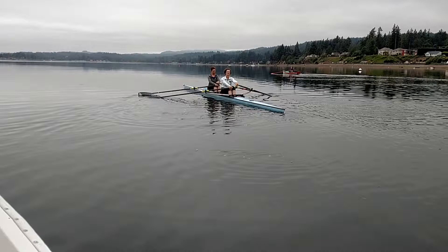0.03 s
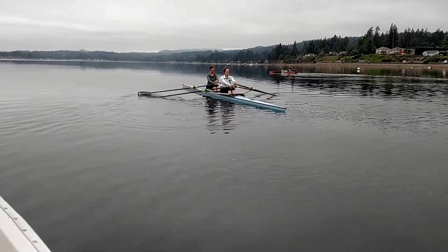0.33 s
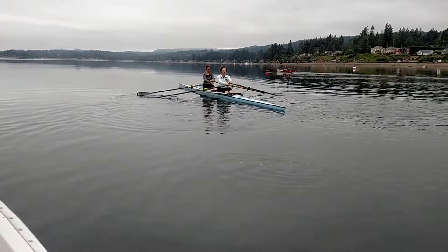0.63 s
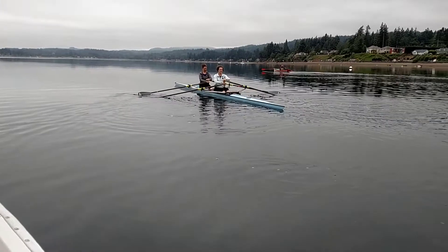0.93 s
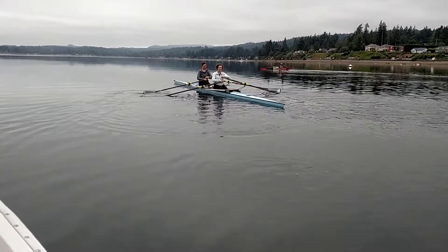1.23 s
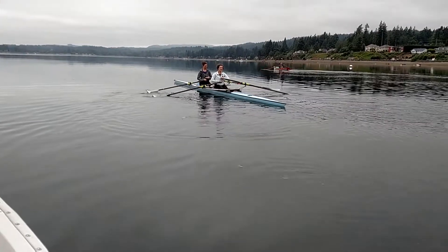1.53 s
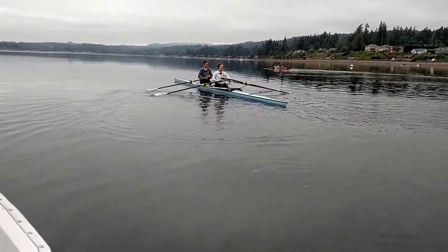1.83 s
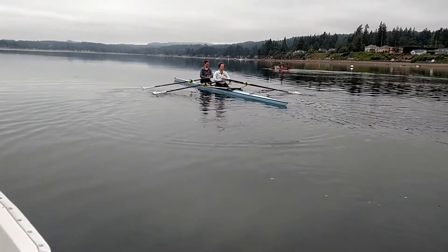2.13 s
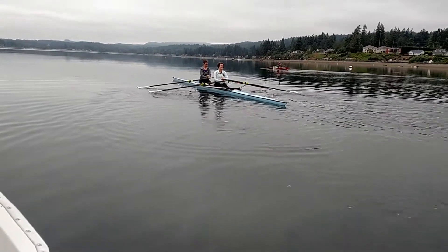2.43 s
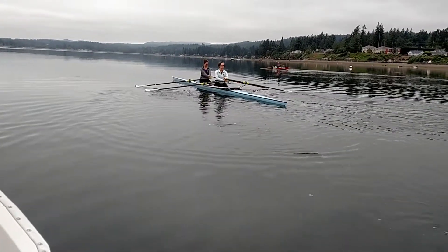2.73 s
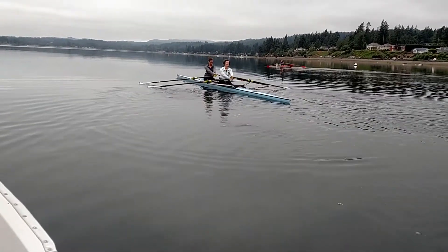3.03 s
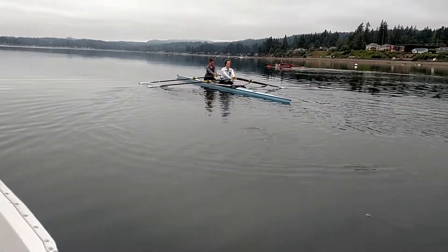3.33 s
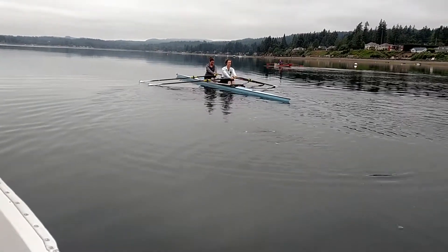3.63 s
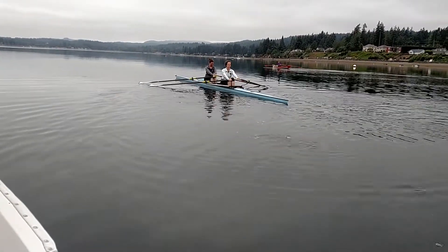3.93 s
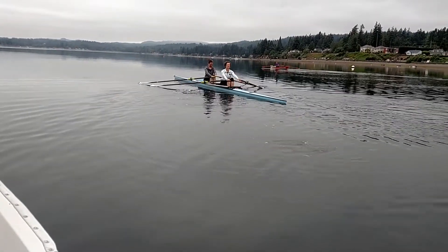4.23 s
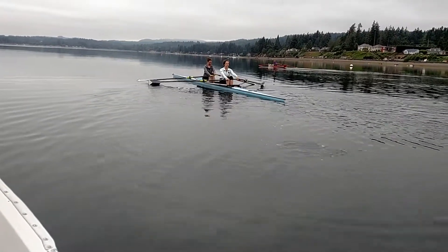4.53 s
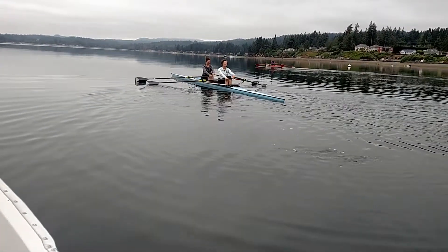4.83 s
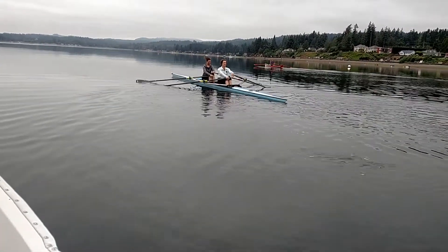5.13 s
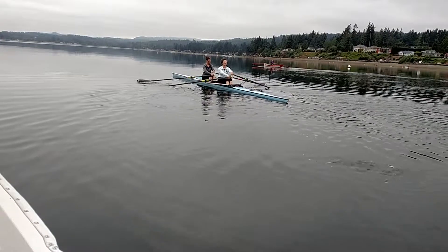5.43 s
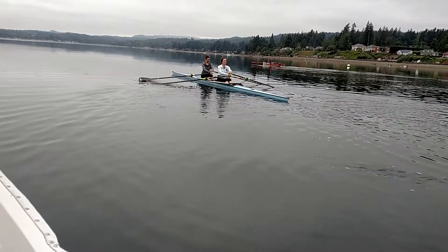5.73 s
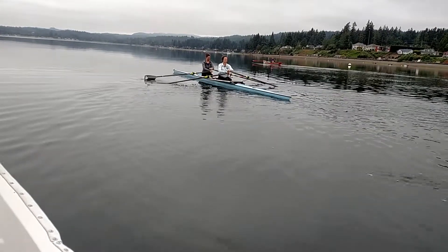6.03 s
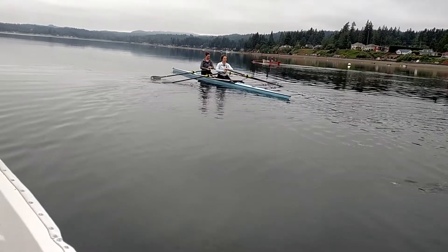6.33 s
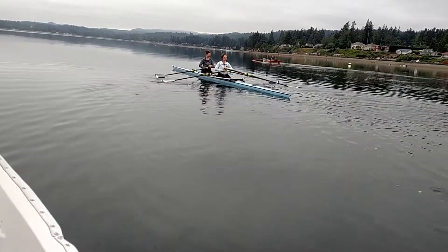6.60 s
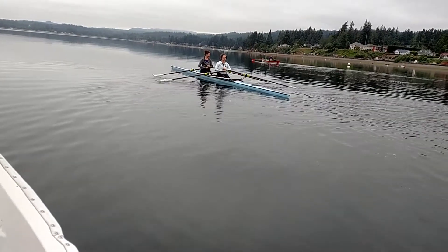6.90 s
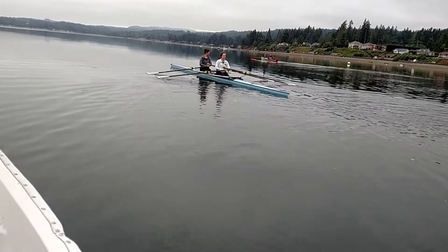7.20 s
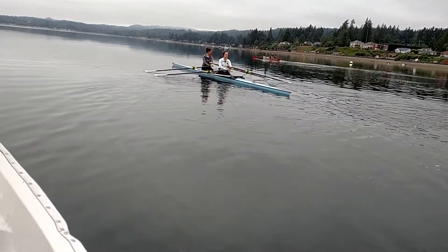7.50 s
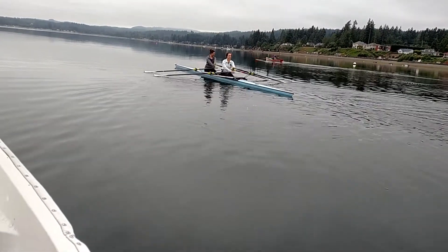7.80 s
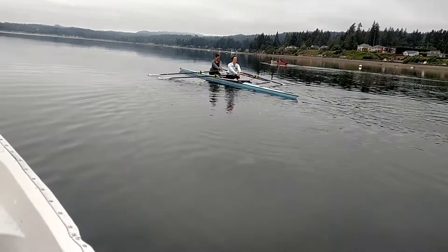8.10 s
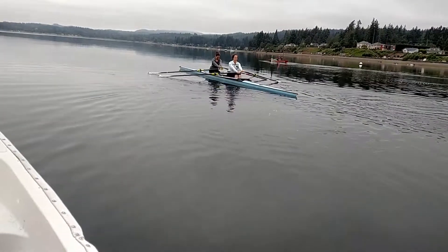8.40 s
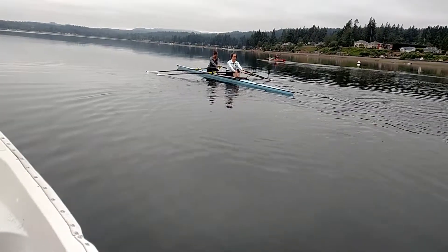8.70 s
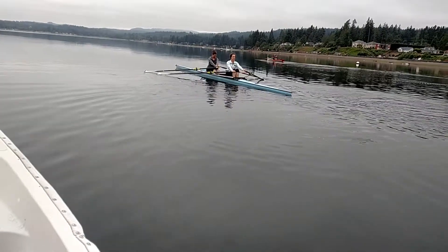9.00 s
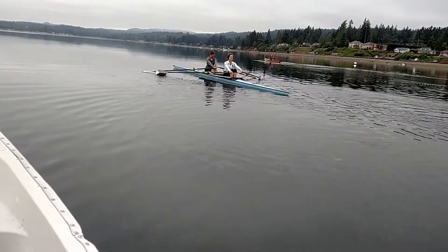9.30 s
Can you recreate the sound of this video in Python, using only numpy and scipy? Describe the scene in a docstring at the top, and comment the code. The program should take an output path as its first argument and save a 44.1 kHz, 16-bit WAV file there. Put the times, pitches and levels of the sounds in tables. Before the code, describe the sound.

On a calm open lake, a small motorboat idles with a muffled hum and a soft wash of water, following a two-person rowing boat. Oar blades splash, gurgle and drip in three main bursts, each with a hollow knock from the oarlocks. A loose fitting on the motorboat rattles now and then. Wind bumps the microphone lightly at first, then grows into strong low buffeting near the end.

```python
"""An outboard idles and water washes along a small launch, which follows a double scull on a calm lake.
The hum is multiples of the firing rate over exhaust burbling under water. The scull's blades slap,
splash and drip, trapping air that rings as bubbles; the oars knock in their locks at the finishes
and once just after a catch. A loose fitting on the launch rattles now and then, and a rising breeze
buffets the microphone."""
import sys
import numpy as np
from scipy import signal
from scipy.io import wavfile
from scipy.ndimage import uniform_filter1d

SR = 44100
rng = np.random.default_rng(int(sys.argv[2]) if len(sys.argv) > 2 else 0)


def output_pcm(signal):
    """Save a mono or channel-first signal as 16-bit PCM at the path in sys.argv[1].

    Samples are clipped to [-1, 1] before scaling.
    """
    pcm = np.clip(np.atleast_2d(signal).T, -1, 1) * 32767
    wavfile.write(sys.argv[1], SR, np.round(pcm).astype(np.int16))


N = 421155
TIME = np.arange(N) / SR
RIPPLE_DB = -67  # floor of the water's stirring

# Outboard loudness. Each row: time in seconds, relative level in dB.
MOTOR_CURVE = [(0.3, -50), (0.8, -55.5), (1.15, -51.5), (1.7, -45.5), (2.05, -56), (2.55, -51), (2.95, -53),
               (3.7, -48), (4.45, -51.5), (5.0, -47), (5.95, -50.5), (6.4, -57), (6.8, -49), (7.2, -58),
               (7.7, -48.5), (8.3, -53.5), (9.55, -49.5)]


def from_db(db):
    """Decibels to gain."""
    return 10 ** (np.asarray(db) / 20)


def unit_rms(x):
    """Scale to rms 1."""
    return x / np.sqrt(np.mean(x ** 2) + 1e-20)


def gain_curve(rows):
    """Rows of (s, dB) to a gain per sample, corners rounded."""
    return uniform_filter1d(from_db(np.interp(TIME, *np.transpose(rows))), size=256)


def db_at(spectrum, hz):
    """Read rows of (Hz, dB) on a log-frequency axis."""
    points_hz, points_db = np.transpose(spectrum)
    return np.interp(np.log(hz), np.log(points_hz), points_db)


def bandpass(x, edges_hz, order):
    """Butterworth band-pass."""
    return signal.sosfilt(signal.butter(order, edges_hz, "band", fs=SR, output="sos"), x)


def drift(rate_hz):
    """Slow random wander, rms about 1."""
    step, run_in = 40, 2000
    pole = np.exp(-2 * np.pi * rate_hz * step / SR)
    white = rng.standard_normal(N // step + run_in + 2)
    slow = signal.lfilter([1], [1, -2 * pole, pole * pole], white)[run_in:]
    return np.interp(np.arange(N) / step, np.arange(len(slow)), unit_rms(slow))


def add(track, start_s, sound):
    """Mix a sound into a track."""
    start = max(round(start_s * SR), 0)
    track[start:start + len(sound)] += sound[:max(N - start, 0)]


def noise(spectrum, flicker_db, flicker_hz):
    """Half-octave noise bands, each flickering on its own; rms 1."""
    out, white = 0, rng.standard_normal((2, N))
    edges_hz = np.geomspace(17, 17400, 21)
    for k, (low, high) in enumerate(zip(edges_hz, edges_hz[1:])):
        hz = np.sqrt(low * high)
        if spectrum[0][0] / 2 < hz < spectrum[-1][0] * 2:
            band = bandpass(white[k % 2], [low, high], order=2)
            out = out + band * from_db(db_at(spectrum, hz) + flicker_db * drift(flicker_hz))
    return unit_rms(out)


def swells(rows, attack_s, release_s, sag_db_per_s=0.0):
    """Gain of events that rise, hold or sag, and die away; their powers add."""
    power = 0
    for start_s, length_s, db in rows:
        age_s = np.maximum(TIME - start_s, 0)
        gain = from_db(db - sag_db_per_s * age_s) * np.minimum(age_s / attack_s, 1)
        power = power + gain ** 2 * np.exp(-np.clip(2 * (age_s - length_s) / release_s, 0, 60))
    return np.sqrt(power)


def outboard(firing_hz=23.155, wander=0.00596, rough_db=1.5, hum_db=4.5, exhaust_db=1.0):
    """Muffled idle: multiples of an unsteady firing rate, over exhaust burbling under water."""
    # Each row: multiple of the firing rate, relative level in dB.
    orders = [(5, -4), (5.5, -3.5), (6, -9.5), (7, -4.5), (9, -4.5), (10, -1), (11, -9), (11.5, -5),
              (12.5, -5.5), (13, -1.5), (14, -4), (15, -11.5), (17, -21.5), (23, -14)]
    # Each row: frequency in Hz, relative density in dB.
    exhaust_spectrum = [(90, -12.5), (125, -0.5), (175, -3.5), (230, -0.5), (315, 0), (400, -17)]
    firings = np.cumsum(firing_hz * (1 + wander * drift(1.995))) / SR
    hum = 0
    for order, db in orders:
        gain = from_db(db + rough_db * drift(6.8))
        hum = hum + gain * np.sin(2 * np.pi * (order * firings + rng.random()))
    burble = noise(exhaust_spectrum, flicker_db=1.5, flicker_hz=13)
    exhaust = signal.sosfilt(signal.butter(6, 360, fs=SR, output="sos"), burble)
    return gain_curve(MOTOR_CURVE) * (from_db(hum_db) * unit_rms(hum) + from_db(exhaust_db) * exhaust)


def wash(level_db=-47.5, motor_share=0.26):
    """The launch pushes through smooth water, a little louder when the motor is."""
    # Each row: frequency in Hz, relative density in dB.
    spectrum = [(25, -6), (70, -13.5), (130, 3), (200, 2), (310, 0.5), (400, 1.5), (560, -4), (750, -7),
                (1100, -7), (1300, -13.5), (1800, -21), (3000, -27), (5000, -33), (9000, -42.5)]
    surge = unit_rms(gain_curve(MOTOR_CURVE) ** motor_share)
    return from_db(level_db) * surge * noise(spectrum, flicker_db=1.85, flicker_hz=10.1)


def wind(breeze_db=-58, rise_db_per_s=1.5, rumble_db=3.5, lumpy_db=4.0,
         flutter_db=-7, flutter_ref_db=-36, flutter_exponent=1.15):
    """Turbulence at the microphone: large eddies rumble; harder gusts carry more small, fast ones."""
    # Each row: frequency in Hz, relative density in dB.
    rumble_spectrum = [(20, -2), (45, 1.5), (75, 2), (120, 0), (165, -8), (230, -16.5), (330, -48),
                       (600, -50.5)]
    # Each row: start in seconds, length in seconds, strength in dB.
    gusts = [(.62, 0.22, -46), (1.24, 0.16, -50), (1.97, 0.14, -48), (2.26, 0.51, -43.5),
             (2.85, 0.5, -50.5), (3.97, 0.41, -44.5), (4.74, 0.29, -45.5), (5.19, 0.21, -40),
             (5.49, 0.23, -39), (5.97, 0.17, -39.5), (6.25, 0.35, -52.5), (6.6, 1.05, -39),
             (7.8, 0.098, -44), (8.24, 0.22, -43.5), (8.54, .07, -32), (8.62, 0.071, -38.5),
             (8.73, 0.16, -34.5), (8.96, 0.17, -36), (9.17, 0.088, -33.5), (9.28, 0.13, -30.5),
             (9.47, .1, -30)]
    rumble = from_db(rumble_db) * noise(rumble_spectrum, flicker_db=2.0, flicker_hz=5.4)
    flutter = unit_rms(bandpass(rng.standard_normal(N), edges_hz=(145, 245), order=4))
    breeze = from_db(breeze_db + rise_db_per_s * TIME)
    strength = np.hypot(breeze, swells(gusts, attack_s=0.0083, release_s=0.052))
    flutter_gain = from_db(flutter_db) * (strength / from_db(flutter_ref_db)) ** flutter_exponent
    lumps = unit_rms(from_db(lumpy_db * drift(22.4)))
    return strength * lumps * (rumble + flutter_gain * flutter)


def stirring(attack_s=0.017, release_s=0.035, drying_db_per_s=3):
    """How hard the water is stirred, as a gain: hull ripples, blade splashes and trickles, run-off."""
    # Each row: start in seconds, length in seconds, strength in dB.
    splashes_and_trickles = [(1.57, 0.032, -59), (1.89, 0.12, -53.5), (2.11, 0.11, -56), (2.33, 0.074, -58),
                             (3.8, 0.14, -62.5), (4.96, 0.057, -60), (6.815, 0.03, -54), (6.96, 0.043, -54),
                             (7.97, .1, -60), (9.45, 0.068, -53.5)]
    # Lifted blades shed water. Each row: start in seconds, length in seconds, initial strength in dB.
    recoveries = [(1.9, 2.07, -59.5), (6.75, 2.9, -59)]
    spray = swells(splashes_and_trickles, attack_s, release_s)
    run_off = swells(recoveries, attack_s, release_s, drying_db_per_s)
    return np.sqrt(from_db(RIPPLE_DB) ** 2 + spray ** 2 + run_off ** 2)


def bubble(hz, t60_cycles, chirp_per_s=1.6, attack_cycles=0.24):
    """Trapped air swells within a cycle, rings down and rises in pitch as it surfaces."""
    t = TIME[:SR // 16]
    tone = np.sin(2 * np.pi * hz * t * (1 + chirp_per_s * t))
    attack = 1 - np.exp(-hz * t / attack_cycles)
    return tone * attack * from_db(-60 * t * hz / t60_cycles)


def splashes(stirred, bubble_db=-1.5, spray_db=-3.0, per_s=450, size_db=2.5, clump_db=2.5):
    """Stirred water: clumps of small bubbles of many pitches over a soft spray."""
    # Each row: frequency in Hz, relative density in dB.
    spectrum = [(400, -6.5), (700, -3.5), (950, 0.5), (1300, -3.5), (1650, -1), (2100, -5), (3200, -10.5),
                (5000, -21), (7500, -26), (12000, -49)]
    clumps = from_db(clump_db * drift(18))
    births_s = TIME[rng.random(N) < per_s * clumps / SR]
    spray = noise(spectrum, flicker_db=-1.5, flicker_hz=22) * clumps
    bubbles = np.zeros(N)
    for start_s, (pitch, size, life) in zip(births_s, rng.random((len(births_s), 3))):
        hz = 600 * 13 ** pitch
        db = db_at(spectrum, hz) - size_db * np.log(size + 0.03)
        height = hz * from_db(db)  # small bubbles die sooner and need more height
        add(bubbles, start_s, height * bubble(hz, t60_cycles=35 * (.5 + life)))
    return stirred * (from_db(bubble_db) * unit_rms(bubbles) + from_db(spray_db) * unit_rms(spray))


def drips(stirred, t60_cycles=52, wobble=0.24, plash_db=-12.0, plash_decay_s=0.0034):
    """Single drops land with a plash and a knot of unsteady bubbles; faint random ones ring just one."""
    # Single drops, and three faint high squeaks at the start.
    # Each row: start in seconds, main tone level in dB, pitch in Hz.
    drops_and_squeaks = [(.352, -57, 3330), (0.386, -52, 3330), (.427, -58.5, 3200), (.778, -47, 2350),
                         (0.835, -44, 1440), (0.977, -44, 1330), (1.342, -54, 2400), (1.715, -50, 1900),
                         (1.825, -50, 3270), (1.849, -38.5, 1900), (1.858, -40, 1080), (1.886, -44, 2000),
                         (1.964, -46, 3220), (2.001, -47, 2400), (2.023, -39, 1210), (2.116, -46, 2030),
                         (2.198, -35.5, 1130), (2.215, -47, 2120), (2.232, -45, 740), (2.402, -48, 3080),
                         (2.41, -46, 2050), (2.545, -50, 3000), (3.108, -52, 4500), (3.911, -41, 1280),
                         (4.226, -46, 2050), (4.798, -40, 1170), (4.875, -40.5, 1760), (4.954, -48, 2140),
                         (4.996, -44.5, 2750), (6.024, -38, 1224), (6.845, -35, 1310), (7.046, -48, 2460),
                         (7.19, -41, 1170), (7.805, -43, 1610)]
    knot_s, knot_db, knot_octaves = .016, -8, 0.21
    faint_per_s, faint_db, tilt_db_per_octave, low_hz, high_hz = 5.7, -54, -4, 1500, 4820
    bubbles, plashes, t = np.zeros(N), np.zeros(N), TIME[:SR // 20]
    for start_s, db, hz in drops_and_squeaks:
        add(bubbles, start_s, from_db(db) * bubble(hz, t60_cycles))
        for lag, detune in rng.random((3, 2)):
            lesser = bubble(hz * 2 ** (knot_octaves * (2 * detune - 1)), t60_cycles)
            add(bubbles, start_s + knot_s * lag, from_db(db + knot_db) * lesser)
        plash = unit_rms(bandpass(rng.standard_normal(len(t)), [hz * 2 / 3, hz * 3 / 2], order=2))
        add(plashes, start_s, from_db(db + plash_db) * plash * np.exp(-t / plash_decay_s))
    unsteady = 1 + wobble * drift(150)
    excess_stir = stirred / from_db(RIPPLE_DB) - 1
    falls_s = TIME[rng.random(N) < faint_per_s * excess_stir / SR]
    for start_s, octaves in zip(falls_s, rng.random(len(falls_s)) * np.log2(high_hz / low_hz)):
        gain = from_db(faint_db + tilt_db_per_octave * octaves)
        add(bubbles, start_s, gain * bubble(low_hz * 2 ** octaves, t60_cycles))
    return bubbles * unsteady + plashes


def slaps(gulp_db=2.0, spray_db=-5.5, spray_t60_s=0.1, attack_s=0.00082):
    """Blade or hull slaps the water, throwing a dull burst and trapping one large bubble."""
    # Each row: start in seconds, relative level in dB, bubble pitch in Hz.
    hits = [(.461, -50, 790), (1.342, -45, 738), (1.666, -39.5, 586), (1.744, -41.5, 590),
            (1.838, -41, 900), (1.849, -38, 716), (1.92, -37, 696), (2.001, -41, 1220),
            (3.892, -40.5, 1300), (4.018, -46, 764), (4.315, -50, 760), (4.936, -39.5, 1260),
            (5.024, -40.5, 1100), (5.053, -42, 1200), (6.016, -39.5, 1430), (6.838, -34.5, 1350),
            (6.869, -38.5, 850), (6.9, -38, 1200), (6.973, -36, 745), (7.015, -40, 1230), (7.044, -42, 920),
            (8.59, -40.5, 1050), (9.475, -46, 3240)]
    # Each row: frequency in Hz, relative density in dB.
    spray_spectrum = [(450, 2.5), (700, 6.5), (950, 0), (1300, 2.5), (1700, -3), (2200, -12), (3200, -16),
                      (5000, -29), (8000, -43)]
    gulps, bursts, t = np.zeros(N), np.zeros(N), TIME[:SR // 4]
    envelope = (1 - np.exp(-t / attack_s)) * from_db(-60 * t / spray_t60_s)
    for start_s, db, hz in hits:
        add(gulps, start_s, from_db(db) * bubble(hz, t60_cycles=36))
        add(bursts, start_s, from_db(db) * envelope)
    spray = bursts * noise(spray_spectrum, flicker_db=1.0, flicker_hz=25)
    return from_db(gulp_db) * gulps + from_db(spray_db) * spray


def buffets(gain_db=1.5, width_cycles=0.79, slowing=0.22):
    """A strong eddy swings the pressure at the microphone a few times, slowing as it passes."""
    # Each row: time of the peak in seconds, relative level in dB, pitch in Hz.
    eddies = [(0.642, -24.5, 67), (1.275, -41, 80), (2.625, -29, 85), (2.775, -30, 68), (3.325, -35, 76),
              (4.279, -25, 99), (4.299, -21, 79), (5.233, -26, 114), (5.375, -26.5, 98), (5.525, -27, 95),
              (5.671, -23.5, 112), (6.628, -22, 105), (6.901, -25.5, 82), (6.96, -16, 81), (7.154, -25, 78),
              (7.209, -23.5, 110), (7.372, -25.5, 103), (7.52, -24.5, 102), (7.652, -27, 80),
              (7.73, -25.5, 84.5), (7.993, -31.5, 105), (8.112, -25, 125), (8.294, -26.5, 104),
              (8.325, -27, 85), (8.404, -25, 84), (8.571, -21, 168), (8.602, -20, 95), (8.675, -22.5, 119),
              (8.768, -15.5, 145), (8.812, -14.5, 128), (8.843, -21, 96), (8.968, -24.5, 110),
              (9.031, -15.5, 118), (9.065, -20, 101), (9.126, -22.5, 117), (9.186, -17, 146),
              (9.208, -20, 96), (9.248, -24, 86), (9.317, -18.5, 87), (9.347, -22, 147), (9.397, -11, 115),
              (9.482, -21.5, 110), (9.509, -16, 165), (9.532, -12, 151)]
    out, t = np.zeros(N), TIME[:SR // 5] - .1
    for (peak_s, db, hz), phase in zip(eddies, rng.random(len(eddies))):
        cycles = hz * t
        swing = np.sin(2 * np.pi * (cycles - slowing * cycles * np.tanh(cycles) + phase))
        add(out, peak_s + t[0], from_db(db + gain_db) * swing / np.cosh(2 * cycles / width_cycles))
    return out


def sloshes(churn_db=-8.0, bubbles_per_s=330, size_range_db=4.0):
    """A hollow left by blade or hull closes with a soft swell and a dense gurgle of large bubbles."""
    # Each row: time of the peak in seconds, gurgle level in dB, half width in seconds.
    hollows = [(1.59, -52, 0.028), (1.686, -52, 0.038), (1.876, -53.5, 0.1), (2.01, -52, 0.048),
               (2.202, -51.5, 0.073), (4.81, -52.5, 0.12), (4.941, -52.5, 0.022), (5.023, -52, 0.1),
               (6.032, -53, 0.033), (6.77, -52, 0.052), (6.877, -51, 0.073), (6.996, -50, 0.061),
               (8.505, -59, 0.11)]
    # Each row: frequency in Hz, relative density in dB.
    spectrum = [(380, 8.5), (550, 7.5), (750, 7.5), (950, 3), (1280, 3.5), (1600, -1.5), (2400, -7)]
    swell = sum(from_db(db) * np.exp(-((TIME - peak_s) / half_s) ** 2) for peak_s, db, half_s in hollows)
    churn = noise(spectrum, flicker_db=4.5, flicker_hz=35)
    gurgle, low_hz, high_hz = np.zeros(N), spectrum[0][0], spectrum[-1][0]
    births_s = TIME[rng.random(N) < bubbles_per_s / SR]
    for start_s, (pitch, size) in zip(births_s, rng.random((len(births_s), 2))):
        hz = low_hz * (high_hz / low_hz) ** pitch
        height = hz * from_db(db_at(spectrum, hz) + size_range_db * size)
        add(gurgle, start_s, height * bubble(hz, t60_cycles=24))
    return swell * (from_db(churn_db) * churn + unit_rms(gurgle))


def spatters(gain_db=-6.5, decay_s=0.0029, width_octaves=0.95):
    """Flung water lands in a crisp crackle a few milliseconds long."""
    # Each row: start in seconds, relative level in dB, band centre in Hz.
    landings = [(1.572, -52, 4200), (1.607, -47, 3300), (1.669, -57, 3700), (1.918, -48, 4300),
                (1.943, -48, 4300), (2.13, -54, 4800), (2.361, -34, 2270), (3.893, -41, 1700),
                (4.314, -47, 3400), (4.715, -46, 2900), (4.935, -46, 3300), (4.994, -40, 3680),
                (6.84, -38, 2900), (6.968, -47, 4000), (7.298, -47.5, 3150), (8.582, -38.5, 2240)]
    out, t = np.zeros(N), TIME[:SR // 20]
    for start_s, db, hz in landings:
        edges_hz = hz * 2 ** (width_octaves * np.array([-.5, .5]))
        crackle = unit_rms(bandpass(rng.standard_normal(len(t)), edges_hz, order=3))
        add(out, start_s, from_db(db + gain_db) * crackle * np.exp(-t / decay_s))
    return out


def ring(force, hz, t60_s):
    """One mode: a unit click starts a decaying sine of height 1."""
    radius, angle = from_db(-60 / (t60_s * SR)), 2 * np.pi * hz / SR
    return signal.lfilter([0, np.sin(angle)], [1, -2 * radius * np.cos(angle), radius ** 2], force + 1e-18)


def loose_fitting(gain_db=4.0, contacts_per_s=2000, contact_db=-6.0, detune=.02,
                  clack_s=0.005, settle_db=-11.0, settle_s=.016):
    """Each shake is a clack and a fainter chatter; the part reseats and rings at slightly new pitches."""
    # Each row: start in seconds, relative peak in dB.
    shakes = [(1.5828, -44), (2.393, -41.5), (2.4854, -39), (2.5786, -42), (2.6725, -42), (2.765, -55),
              (2.856, -49), (2.9468, -46), (3.2038, -46), (3.374, -43), (5.8481, -42), (5.941, -43.5),
              (6.127, -48), (6.755, -43), (7.2272, -44), (7.301, -49), (7.412, -46.5), (7.5526, -40.5),
              (7.643, -41), (7.806, -45.5), (7.912, -46), (8.039, -45), (8.0954, -47), (8.170, -43.5),
              (8.2675, -42.5), (8.4444, -41), (8.468, -44.5), (8.543, -46), (8.7154, -43), (8.8503, -46.5),
              (8.911, -54), (9.243, -47.5)]
    # Each row: frequency in Hz, relative energy in dB, t60 in seconds.
    modes = [(910, -2.5, 0.018), (1233, 1.5, 0.027), (1330, -1, 0.034), (1740, -3.5, 0.014),
             (2290, -10, 0.007), (3250, -12.5, 0.005), (4780, -15, .026), (5250, -22, 0.0078),
             (6930, -23, 0.0089)]
    out, t = np.zeros(N), TIME[:SR // 10]
    force = np.exp(-t / clack_s) + from_db(settle_db) * np.exp(-t / settle_s)
    for start_s, db in shakes:
        contacts = rng.standard_normal(len(t)) * (rng.random(len(t)) < contacts_per_s / SR) * force
        ringing = 0
        for hz, mode_db, t60_s in modes:
            seated_hz = hz * (1 + detune * rng.uniform(-1.1, 1))
            ringing = ringing + from_db(mode_db) * unit_rms(ring(contacts, seated_hz, t60_s))
        clack = bandpass(ringing + from_db(contact_db) * unit_rms(contacts), [700, 7500], order=2)
        add(out, start_s, from_db(db + gain_db) * clack / np.abs(clack).max())
    return out


def oarlocks(gain_db=1.7, low_hz=1050, thud_db=-10.0):
    """Sleeve hits lock: a hollow plastic knock, each with its own brightness and ring, over a shaft thud."""
    # Each row: start in seconds, relative level in dB, t60 multiplier, top of the contact band in Hz.
    knocks = [(2.178, -27.5, .55, 2900), (5.1542, -32, .8, 2590), (5.1620, -27.5, 2, 2150),
              (5.167, -33, 2.7, 1950), (7.1293, -36, 1.5, 2600), (7.1336, -24.5, 1.1, 2980)]
    # Each row: frequency in Hz, relative level in dB, base t60 in seconds.
    modes = [(1340, -16, 0.011), (1560, -5, 0.0074), (2120, -3, 0.0061), (2800, -9, 0.0038)]
    out, click = np.zeros(N), signal.unit_impulse(SR // 10)
    thud = from_db(thud_db) * ring(click, hz=700, t60_s=.012)
    for start_s, db, stretch, top_hz in knocks:
        contact = bandpass(click, [low_hz, top_hz], order=6)
        knock = sum(from_db(mode_db) * ring(contact, hz, t60_s * stretch) for hz, mode_db, t60_s in modes)
        add(out, start_s, from_db(db) * (knock + thud))
    return from_db(gain_db) * out


def scene():
    """Open water, mono: everything arrives directly, without echo."""
    launch = outboard() + wash() + loose_fitting()
    stirred = stirring()
    scull = oarlocks() + slaps() + spatters() + sloshes() + drips(stirred) + splashes(stirred)
    return (launch + scull + wind() + buffets())[None]


def record(dry, hiss_db=-73.5, fade_out_s=.004, cutoff_hz=15600):
    """Steady microphone hiss, short fades at both ends and a steep low-pass."""
    # Each row: time in seconds, gain in dB; the last gain holds.
    fade_in = [(0, -65), (.112, -62), (.118, -19.5), (.165, -18.5), (.175, -12.5), (.26, -10), (.33, -4.5)]
    # Each row: frequency in Hz, relative density in dB.
    hiss_spectrum = [(1000, -2.5), (7000, 3.5), (9500, 1), (16000, -3.5)]
    fade = gain_curve(fade_in) * np.minimum((TIME[-1] - TIME) / fade_out_s, 1)
    hiss = from_db(hiss_db) * noise(hiss_spectrum, flicker_db=0.5, flicker_hz=10)
    lowpass = signal.ellip(12, .1, 80, cutoff_hz, fs=SR, output="sos")
    return signal.sosfilt(lowpass, (dry + hiss) * fade)


dry = scene()
out = record(dry)
output_pcm(out)
```